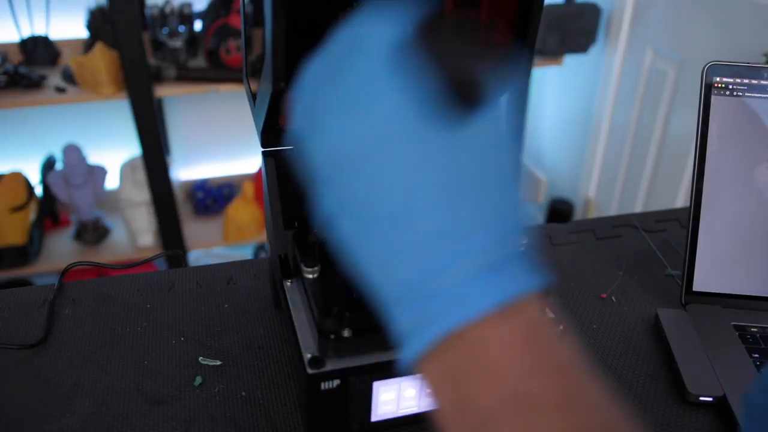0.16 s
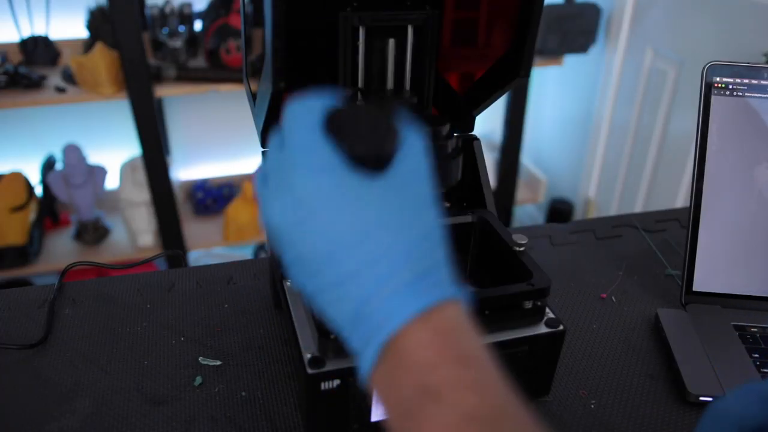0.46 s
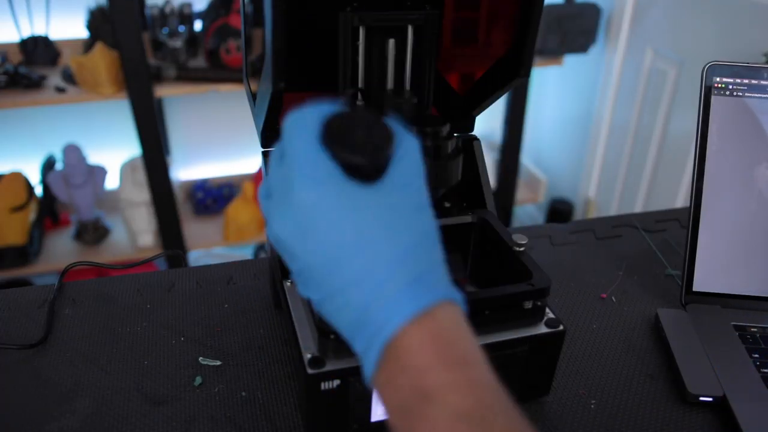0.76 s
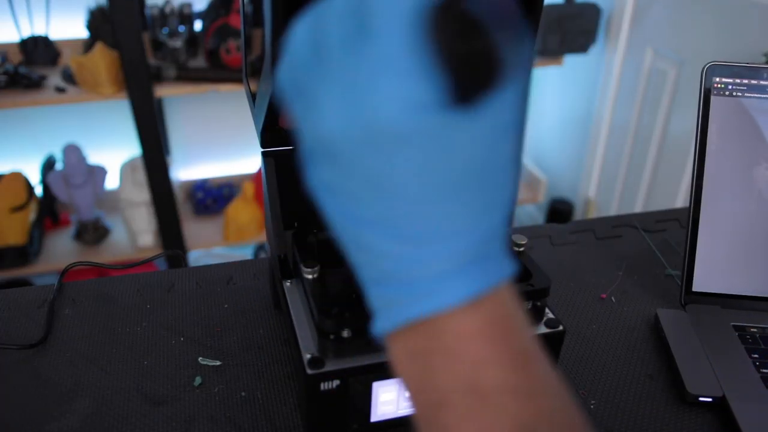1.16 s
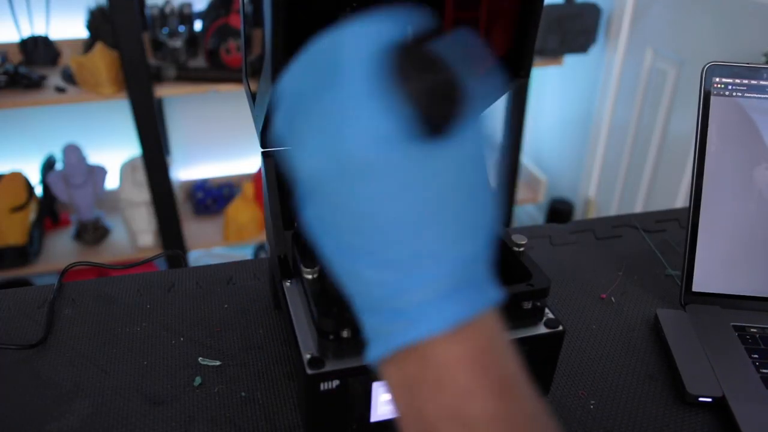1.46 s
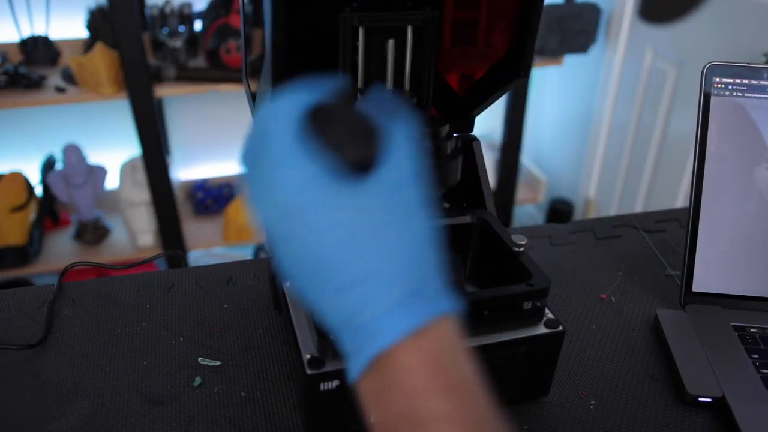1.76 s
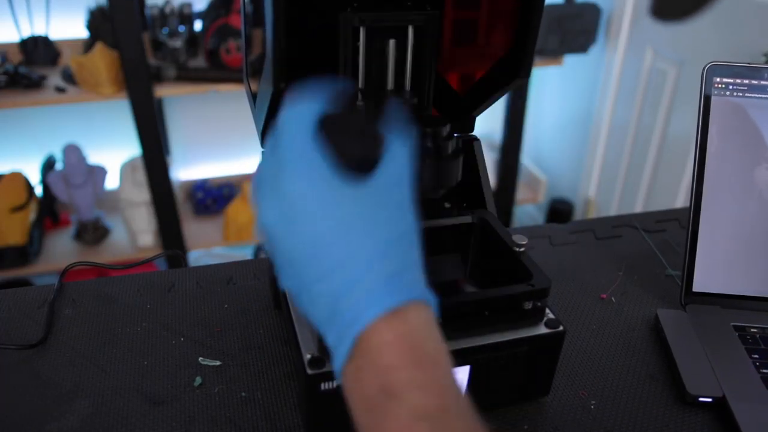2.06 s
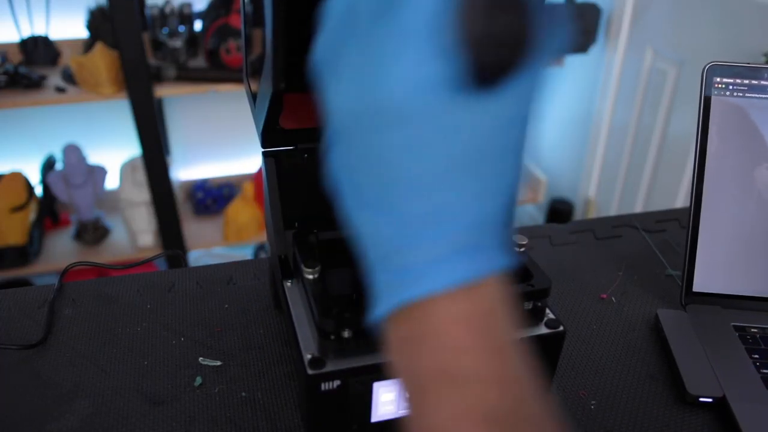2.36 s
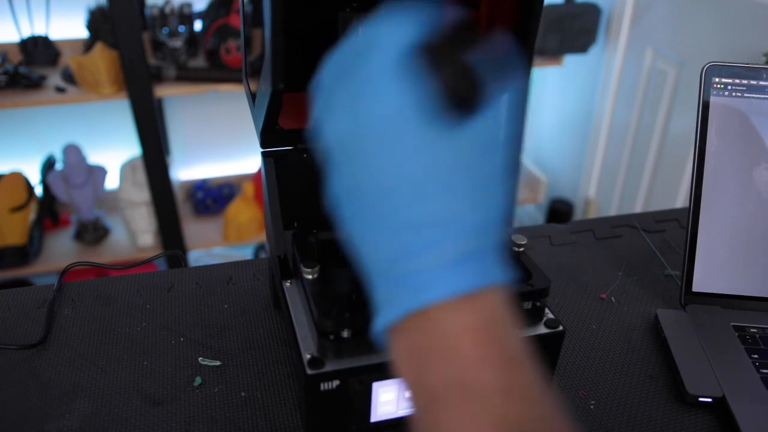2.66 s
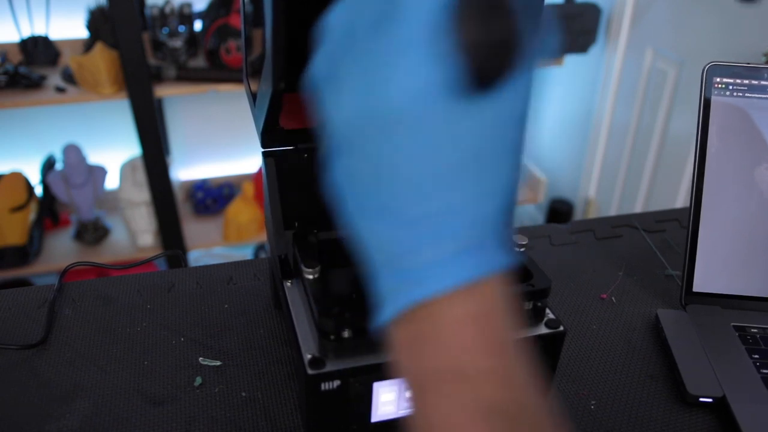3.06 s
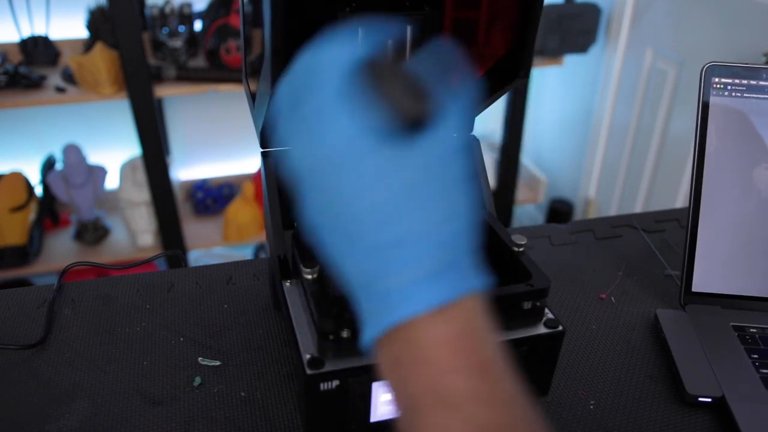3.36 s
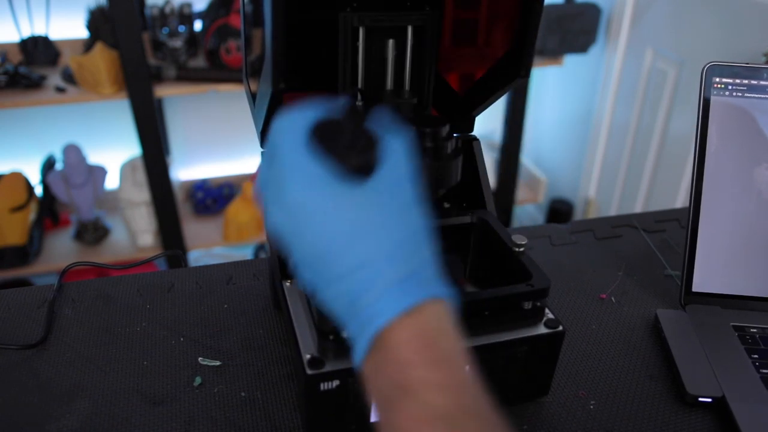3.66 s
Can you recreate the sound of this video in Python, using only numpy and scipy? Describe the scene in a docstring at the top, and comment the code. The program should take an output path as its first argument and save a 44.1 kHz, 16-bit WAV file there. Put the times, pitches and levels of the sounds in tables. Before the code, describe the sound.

Rapid vigorous shaking of liquid in a small plastic bottle, with clacking slaps and bubbly pops

```python
"""In a small room, close to the microphone, a small plastic bottle of resin is shaken hard, about six
strokes a second. Liquid thumps onto trapped air (gliding damped rings) or slaps the wall (ringing modes
and a noise crack), with spray (grainy noise), splashes and draining drops (clouds of short rings).
Air pockets pop as single short rings; froth and gurgles are the same rings at random times.
Changing random echoes and fixed standing waves make the room, over a faint, slightly wide hiss."""
import sys
import numpy as np
from scipy import signal
from scipy.fft import rfft, irfft
from scipy.io import wavfile

SR = 44100
rng = np.random.default_rng(int(sys.argv[2]) if len(sys.argv) > 2 else 0)


def wav_record(signal):
    """Record a signal, one row per channel, as 16-bit PCM in the file named by sys.argv[1]."""
    frames = np.transpose(np.atleast_2d(signal))
    bounded = np.clip(frames, -1, 1)
    # unit amplitude maps onto the largest positive 16-bit level
    quanta = np.round(bounded * 32767).astype(np.int16)
    wavfile.write(sys.argv[1], SR, quanta)


N = 167580  # length in samples

# steady background, middle and left-right difference: frequency_hz, relative_level_db
HISS_COLOUR = [(20, -14), (45, 2.5), (150, 2.5), (500, -1), (1200, -19), (3500, -4.5), (7000, -18.5),
               (16000, -22)]
SIDE_COLOUR = [(30, 9), (500, -0.5), (2500, -19), (9000, 5), (16000, 1.5)]
HISS_DB, SIDE_DB = -61.5, -76  # rms

# every bubble: swell in cycles of its pitch, strength of the upward glide
BUBBLE_RISE_CYCLES, BUBBLE_GLIDE = 0.53, 0.19
POP_CYCLES = 10.3  # cycles in a 60 dB decay, for pops and gurgles

# fine froth, and larger, softer bubbles in the swirling liquid; levels are rms inside the bottle
FROTH_PER_S, FROTH_DB, FROTH_HZ, FROTH_CYCLES = 330, -63, 2700, 6
GURGLE_PER_S, GURGLE_DB, GURGLE_HZ = 150, -64, 859
FROTH_SPREAD_OCT, FROTH_SCATTER_DB = 0.712, 7.5  # standard deviations

# bursts of small bubbles: start_s, length_s, level_db (rms over that length), middle_pitch_hz
SPLASH_BURSTS = [(0.036, 0.016, -44, 3300), (0.449, 0.012, -38, 2510), (0.534, 0.0095, -38.5, 2380),
                 (0.681, 0.027, -50, 3320), (0.824, 0.022, -45, 3200), (0.857, 0.014, -39, 3200),
                 (0.991, 0.02, -42.5, 1450), (1.011, 0.018, -40.5, 3530), (1.181, 0.0057, -46.5, 3820),
                 (1.34, 0.0059, -42.5, 3400), (1.459, 0.0096, -42, 1820), (1.498, 0.0028, -40, 3130),
                 (1.515, 0.011, -45.5, 2110), (1.745, 0.026, -35.5, 2800), (1.8054, 0.0065, -31.5, 2190),
                 (1.823, 0.014, -36.5, 2900), (2.17, 0.0087, -32, 2180), (2.338, 0.017, -41, 3030),
                 (2.511, 0.026, -40.5, 2700), (2.6, 0.024, -42.5, 4080), (2.868, 0.016, -40, 1970),
                 (2.961, 0.0099, -44, 2700), (3.046, 0.012, -37, 2190), (3.216, 0.0064, -33.5, 2020),
                 (3.315, 0.0085, -46, 2700), (3.388, 0.02, -37, 1880), (3.557, 0.026, -40.5, 3500),
                 (3.65, 0.027, -43.5, 3640)]
SPLASH_SPREAD_OCT, SPLASH_SCATTER_DB = 0.599, 0.5  # standard deviations
SPLASH_CYCLES, SPLASH_PER_S, FIZZ_DB = 12, 1800, -24  # fizz relative to the bubbles

# drops running back after a splash: level relative to it, decay time, rate
DRAIN_DB, DRAIN_S, DRAIN_PER_S = -12.5, 0.043, 450

# liquid landing on a cushion of air: start_s, nominal_pitch_hz, peak_db before churning, t60_s
THUMP_HITS = [(0.198, 700, -36, 0.022), (.451, 652, -36, 0.036), (.539, 439, -24.5, 0.033),
              (.697, 366, -28, 0.015), (.727, 760, -41, 0.018), (.810, 160, -40.5, 0.047),
              (.992, 585, -29, 0.014), (0.999, 775, -32.5, 0.015), (1.182, 405, -29.5, 0.02),
              (1.339, 372, -30, 0.039), (1.499, 391, -28.5, 0.047), (1.740, 497, -36.5, 0.018),
              (1.754, 643, -33, 0.014), (1.810, 587, -38.5, 0.061), (2.169, 374, -34, 0.038),
              (2.338, 423, -22.5, 0.0099), (2.353, 476, -52, 0.022), (2.604, 583, -30, 0.015),
              (3.045, 700, -28, 0.0056), (3.218, 388, -30.5, 0.03), (3.387, 970, -23.5, 0.013),
              (3.488, 298, -28, 0.01), (3.492, 520, -34, 0.02), (3.562, 514, -24, 0.015),
              (3.575, 560, -40, 0.023), (3.653, 373, -39, 0.018), (3.663, 598, -32, 0.015),
              (3.671, 740, -32, 0.011), (3.68, 563, -33.5, 0.011)]
THUMP_RISE_S, THUMP_GLIDE = 0.00082, 0.5
CHURN_DEPTH, CHURN_HZ = 0.53, 130  # rms depth, low-pass edge of the unevenness
# smaller pockets torn off each thump; level relative to it
BREAKUP_GAP_S, BREAKUP_DB, BREAKUP_SPREAD_OCT, BREAKUP_T60_S = 0.006, -11, 0.27, 0.0093

# air pockets popping: start_s, nominal_pitch_hz, peak_db
AIR_POPS = [(0.2662, 1940, -20.5), (.306, 2770, -32), (.317, 1500, -33.5), (0.3933, 3380, -23.5),
            (.605, 2590, -29.5), (.622, 2920, -30.5), (0.671, 1580, -28), (0.822, 1450, -35.5),
            (.829, 4180, -27), (.950, 3400, -29), (1.2088, 3070, -23), (1.353, 3200, -23.5),
            (1.515, 3300, -26), (1.657, 3470, -24.5), (1.7464, 2950, -14), (1.7745, 2700, -16.5),
            (1.807, 1080, -24), (1.8206, 3600, -23), (1.8572, 3740, -21), (1.9212, 3200, -22.5),
            (2.1668, 1580, -16.5), (2.344, 2400, -23), (2.364, 3140, -26), (2.513, 3200, -11.5),
            (2.531, 1920, -30), (2.6118, 2770, -24.5), (2.684, 1500, -41), (2.784, 1270, -33),
            (2.867, 1550, -28), (2.958, 2140, -18.5), (2.989, 2700, -26.5), (3.047, 1620, -16),
            (3.170, 3430, -26.5), (3.192, 1450, -38), (3.216, 1814, -18), (3.322, 1020, -31.5),
            (3.401, 2050, -26.5), (3.519, 3500, -25.5)]

# liquid striking the bare wall:
# start_s, ring_peak_db, tilt_db_per_octave, crack_db (relative to the ring's peak)
WALL_SLAPS = [(0.452, -21, -5, -31), (.536, -20, 11, -2), (0.8635, -20, -5, -26), (1.0123, -19, 5, -5),
              (1.360, -22.5, -14, -32), (1.7467, -24, -7, -9), (1.823, -13, 18, -18),
              (1.987, -38.5, -5, 16), (2.171, -10.5, -4.5, -9), (2.257, -30, -13, 2),
              (2.3396, -19, 12, -25), (2.5129, -17, -11, -4), (2.608, -21.5, 20, -27),
              (2.8682, -26.5, -18, -5), (3.134, -31.5, -9, 0), (3.2166, -13, -4.5, -14),
              (3.3871, -15.5, -9, -38)]
# ringing modes of the bottle's wall: nominal_pitch_hz, relative_level_db before tilt, t60_s
WALL_MODES = [(700, -15, 0.009), (1052, -11, 0.026), (1648, 4, 0.016), (2400, -8, 0.017),
              (3200, 15, 0.0062), (3760, 17, 0.006), (4500, -17, 0.018)]
WALL_DETUNE, TILT_PIVOT_HZ = 0.043, WALL_MODES[3][0]  # detune: fraction of pitch
CRACK_S, CRACK_TOP_HZ = 0.0006, 8600
REBOUND_DB, REBOUND_S = -9, 0.0018  # scale of level and of spacing

# short bursts of fine spray, some along with a slap:
# start_s, level_db (rms at its height), middle_pitch_hz
SPRAY_HITS = [(0.858, -48, 4630), (.991, -38.5, 4300), (1.011, -30, 5040), (1.746, -35.5, 7030),
              (2.513, -32.5, 3500), (2.611, -33.5, 4700), (3.22, -31, 6650)]
SPRAY_S, SPRAY_WIDTH_OCT = 0.0011, 0.97  # time to its height, bandwidth

BASS_CUT_HZ = 176

# colour of the room's echoes: frequency_hz, gain_db
ECHO_COLOUR = [(100, -17), (190, -14.5), (280, -2.5), (420, -6.5), (650, -2), (1200, -12), (2500, -6.5),
               (4500, -3.5), (7000, -11.5), (15000, -14)]
# decay of the diffuse tail: frequency_hz, t60_s
TAIL_DECAY = [(200, 0.39), (530, 0.36), (1400, 0.4), (3700, 0.28), (10000, 0.31)]
# the room's standing waves: pitch_hz, gain_db at resonance, t60_s
STANDING_WAVES = [(151, 2, 0.28), (292.6, 2, 0.071), (357.7, 3.5, 0.2), (424.7, -1, 0.24), (568, -2, 0.05),
                  (1077, 0.5, 0.45), (1507, -6, 0.18)]
ROOM_DELAY_S, MOVE_S = 0.002, 0.085  # before the echoes; between bottle positions
EARLY_DB, EARLY_S = 1.5, 0.0013  # relative to the tail before colouring; decay time

TOP_HZ = 16000


def undb(db):
    """Decibels to gain."""
    return 10 ** (np.asarray(db) / 20)


def level(x, db):
    """Scale to an rms level."""
    return x * undb(db) / np.sqrt(np.mean(x ** 2) + 1e-20)


def along(hz, points):
    """Read (Hz, value) points on a log-frequency axis."""
    f, v = np.array(points, float).T
    return np.interp(np.log(hz + 1e-6), np.log(f), v)


def colour(x, points):
    """Shape a sound's spectrum by (Hz, dB) points."""
    gain = undb(along(np.fft.rfftfreq(len(x), 1 / SR), points))
    return irfft(rfft(x) * gain, len(x))


def clock(seconds):
    """Sample times from zero."""
    return np.arange(max(int(seconds * SR), 8)) / SR


def fade(t, t60):
    """Exponential decay, 60 dB down at t60."""
    return np.exp(-np.log(1000) * t / t60)


def add(out, at, x):
    """Mix a sound in at a time."""
    i = max(int(at * SR), 0)
    part = out[i:i + len(x)]
    part += x[:len(part)]


def ping(hz, t60, rise, glide):
    """A damped ring that swells without a click, rising through its pitch."""
    t = clock(1.5 * t60)
    turns = hz * t * np.exp(glide * (t / t60 - .5) / 2)
    swell = 1 - np.exp(-(t / rise) ** 2)
    return np.sin(2 * np.pi * turns) * fade(t, t60) * swell


def pocket(hz, db, t60, rise, glide):
    """Trapped air rings at a pitch set by its size; db is its peak."""
    ring = ping(hz, t60, rise, glide)
    return undb(db) * ring / np.abs(ring).max()


def bubbles(times, sizes, pitches, cycles, seconds):
    """Many tiny bubbles, each ringing for a few cycles."""
    out = np.zeros(len(clock(seconds)))
    for at, size, hz in zip(times, sizes, np.clip(pitches, 250, 9500)):
        add(out, at, size * ping(hz, cycles / hz, BUBBLE_RISE_CYCLES / hz, BUBBLE_GLIDE))
    return out


def hiss():
    """Steady coloured noise, common to both channels and opposed between them."""
    mid = level(colour(rng.standard_normal(N), HISS_COLOUR), HISS_DB)
    side = level(colour(rng.standard_normal(N), SIDE_COLOUR), SIDE_DB)
    return mid, side


def stray(per_s, db, hz, cycles):
    """Bubbles burst at random times, with scattered sizes and pitches."""
    count = int(per_s * N / SR)
    times = rng.random(count) * N / SR
    size, pitch = rng.standard_normal((count, 2)).T
    sizes = undb(FROTH_SCATTER_DB * np.minimum(size, 2))
    pitches = hz * 2 ** (FROTH_SPREAD_OCT * pitch)
    return level(bubbles(times, sizes, pitches, cycles, N / SR), db)


def froth():
    """Fine froth crackles and the swirling liquid gurgles softly."""
    crackle = stray(FROTH_PER_S, FROTH_DB, FROTH_HZ, FROTH_CYCLES)
    gurgle = stray(GURGLE_PER_S, GURGLE_DB, GURGLE_HZ, POP_CYCLES)
    return crackle + gurgle


def splashes():
    """The liquid breaks into a thinning burst of bubbles, with fizz following their waveform."""
    out = np.zeros(N)
    for at, length, db, hz in SPLASH_BURSTS:
        size, pitch, jitter = rng.standard_normal((256, 3)).T
        times = np.abs(np.arange(len(size)) + jitter) / SPLASH_PER_S
        sizes = undb(SPLASH_SCATTER_DB * size) * np.exp(-(times / length) ** 2)
        pitches = hz * 2 ** (SPLASH_SPREAD_OCT * pitch)
        burst = bubbles(times, sizes, pitches, SPLASH_CYCLES, .2)
        burst = burst + undb(FIZZ_DB) * np.abs(burst) * rng.standard_normal(len(burst))
        add(out, at, burst * undb(db) * np.sqrt(length * SR / np.sum(burst ** 2)))
    return out


def drain():
    """After each splash, drops patter back down the wall as short, fading rings."""
    out = np.zeros(N)
    for at, length, db, hz in SPLASH_BURSTS:
        size, pitch, jitter = rng.standard_normal((64, 3)).T
        times = np.abs(np.arange(len(size)) + jitter) / DRAIN_PER_S
        sizes = undb(FROTH_SCATTER_DB * np.minimum(size, 2)) * np.exp(-times / DRAIN_S)
        pitches = hz * 2 ** (SPLASH_SPREAD_OCT * pitch)
        drops = bubbles(times, sizes, pitches, FROTH_CYCLES, .2)
        gain = undb(db + DRAIN_DB) * np.sqrt(length * SR / np.sum(drops ** 2))
        add(out, at + length, drops * gain)
    return out


def thumps():
    """A large air pocket rings and breaks into smaller ones; churning liquid makes the ring uneven."""
    out = np.zeros(N)
    slow = signal.butter(2, CHURN_HZ, fs=SR, output="sos")
    churn = level(signal.sosfilt(slow, rng.standard_normal(N)), 0)
    for at, hz, db, t60 in THUMP_HITS:
        add(out, at, pocket(hz, db, t60, THUMP_RISE_S, THUMP_GLIDE))
        for k, (jitter, pitch) in enumerate(rng.uniform(-0.93, 1, size=(3, 2))):
            piece_hz = hz * 2 ** (BREAKUP_SPREAD_OCT * pitch)
            piece = pocket(piece_hz, db + BREAKUP_DB, BREAKUP_T60_S, THUMP_RISE_S, THUMP_GLIDE)
            add(out, at + (k + 1 + jitter / 2) * BREAKUP_GAP_S, piece / np.sqrt(k + 1))
    return out * (1 + CHURN_DEPTH * churn)


def pops():
    """Small air pockets all ring for the same number of cycles, so higher ones die sooner."""
    out = np.zeros(N)
    for at, hz, db in AIR_POPS:
        add(out, at, pocket(hz, db, POP_CYCLES / hz, BUBBLE_RISE_CYCLES / hz, BUBBLE_GLIDE))
    return out


def wall_ring(t, tilt):
    """The wall's modes ring together, each slightly detuned, tilted in level about a pivot."""
    ring = np.zeros(len(t))
    for hz, db, t60 in WALL_MODES:
        gain = undb(db + tilt * np.log2(hz / TILT_PIVOT_HZ))
        pitch = hz * (1 + WALL_DETUNE * rng.standard_normal())
        ring += gain * np.sin(2 * np.pi * pitch * t) * fade(t, t60)
    return ring / np.abs(ring).max()


def slaps():
    """The liquid hits the wall in a blow and a few quick rebounds: its modes ring under a crack."""
    out, t = np.zeros(N), clock(.04)
    soften = signal.butter(2, CRACK_TOP_HZ, fs=SR, output="sos")
    for at, db, tilt, crack_db in WALL_SLAPS:
        ring = wall_ring(t, tilt)
        # halved so that the noise peaks come near the ring's scale
        crack = signal.sosfilt(soften, rng.standard_normal(len(t))) * np.exp(-t / CRACK_S) / 2
        blow = undb(db) * (ring + undb(crack_db) * crack)
        add(out, at, blow)
        gaps = np.cumsum(rng.uniform(.3, 1.7, 3))
        for gap, size in zip(gaps, rng.standard_normal(3)):
            rebound = blow * np.tanh(size) * undb(REBOUND_DB) / np.sqrt(1 + gap)
            add(out, at + gap * REBOUND_S, rebound)
    return out


def sprays():
    """Countless tiny droplets hit the wall in one quick, grainy swell of band-passed noise."""
    out, t = np.zeros(N), clock(.04)
    for at, db, hz in SPRAY_HITS:
        edges = np.minimum(hz * 2 ** (SPRAY_WIDTH_OCT * np.array([-.5, .5])), TOP_HZ)
        band = signal.butter(4, edges, "band", fs=SR, output="sos")
        grains = signal.sosfilt(band, rng.laplace(size=len(t)))
        swell = t / SPRAY_S * np.exp(1 - t / SPRAY_S)
        add(out, at, level(grains, db) * swell)
    return out


def through_wall(x):
    """A small closed bottle radiates little bass."""
    return signal.sosfilt(signal.butter(2, BASS_CUT_HZ, "high", fs=SR, output="sos"), x)


def reflections():
    """The echoes at one position: quick ones off the bench, then a short diffuse tail."""
    t = clock(.4)
    f, noise = np.fft.rfftfreq(len(t), 1 / SR), rfft(rng.standard_normal(len(t)))
    tail = np.zeros(len(t))
    for k, (_, t60) in enumerate(TAIL_DECAY):
        # overlapping bands, each with its own decay
        band = along(f, [(row[0], j == k) for j, row in enumerate(TAIL_DECAY)])
        tail += irfft(noise * band, len(t)) * fade(t, t60)
    early = rng.standard_normal(len(t)) * np.exp(-t / EARLY_S)
    echoes = tail / np.linalg.norm(tail) + undb(EARLY_DB) * early / np.linalg.norm(early)
    return colour(echoes, ECHO_COLOUR)[t < .3]


def room(x):
    """The echoes change as the bottle moves; the room's standing waves stay."""
    t, step = clock(.4), int(MOVE_S * SR)
    waves = np.zeros(len(t))
    for hz, db, t60 in STANDING_WAVES:
        unit_gain = 2 * np.log(1000) / (t60 * SR)
        waves += undb(db) * unit_gain * np.cos(2 * np.pi * hz * t) * fade(t, t60)
    out = signal.fftconvolve(x, waves)[:N]
    for i in range(0, N, step):
        # half-sine windows overlap by half, each with fresh echoes
        part = x[i:i + 2 * step]
        window = np.sin(np.pi * np.arange(len(part)) / (2 * step))
        add(out, i / SR + ROOM_DELAY_S, signal.fftconvolve(part * window, reflections()))
    return out


def scene():
    """The bottle straight ahead, its room, and the background hiss."""
    hiss_mid, hiss_side = hiss()
    liquid = froth() + splashes() + drain() + thumps() + pops() + slaps() + sprays()
    bottle = through_wall(liquid)
    mid = bottle + room(bottle) + hiss_mid
    return np.array([mid + hiss_side, mid - hiss_side])


def record(dry):
    """The recorder cuts the top with a steep low-pass."""
    return signal.sosfilt(signal.ellip(8, .2, 70, TOP_HZ, fs=SR, output="sos"), dry)


dry = scene()
out = record(dry)
wav_record(out)
```